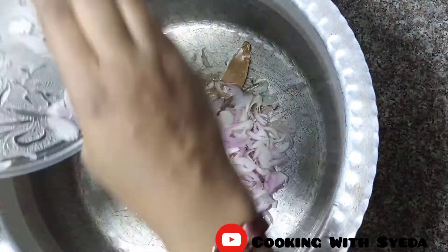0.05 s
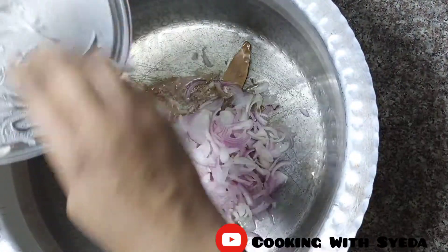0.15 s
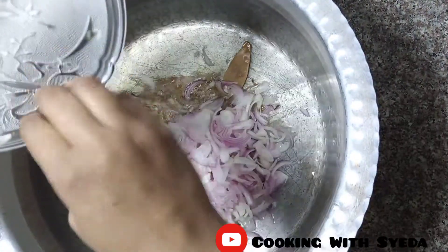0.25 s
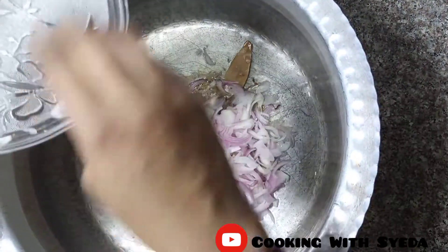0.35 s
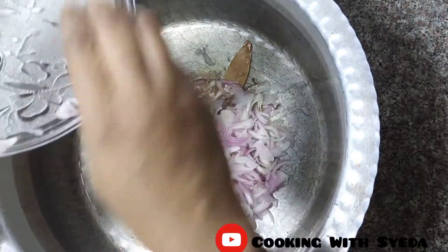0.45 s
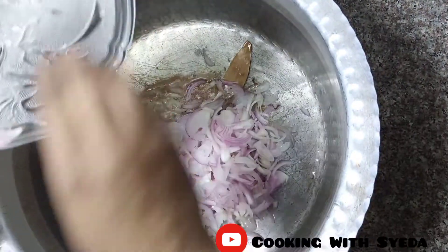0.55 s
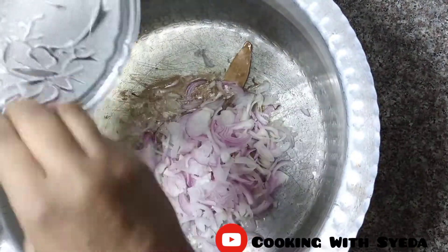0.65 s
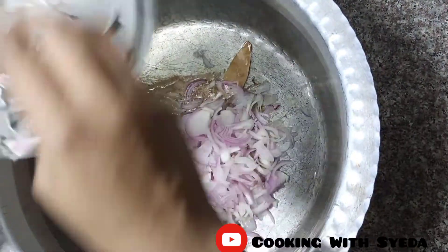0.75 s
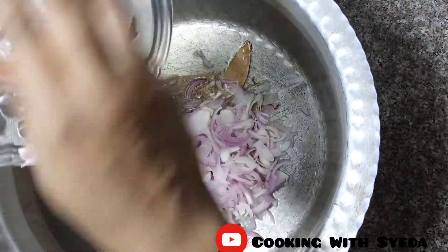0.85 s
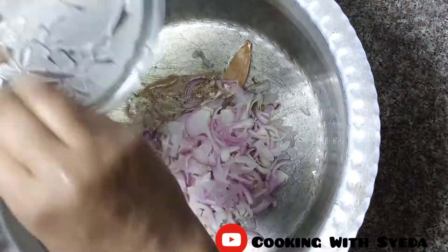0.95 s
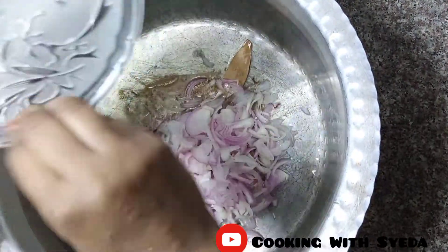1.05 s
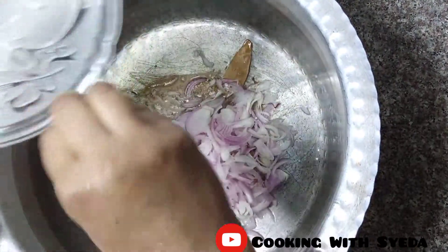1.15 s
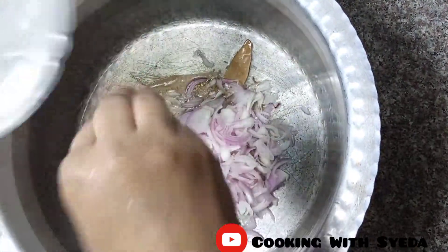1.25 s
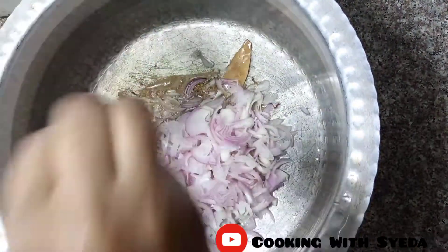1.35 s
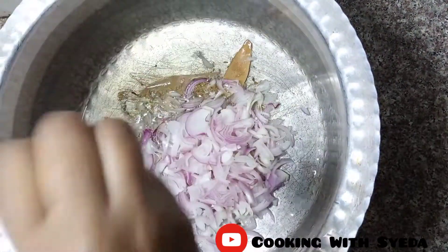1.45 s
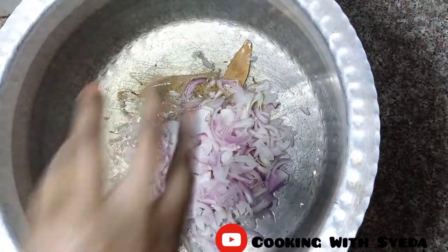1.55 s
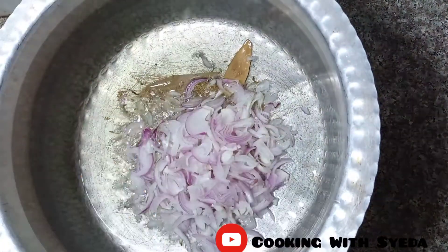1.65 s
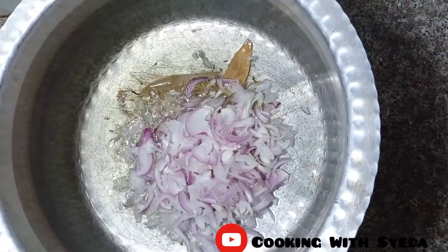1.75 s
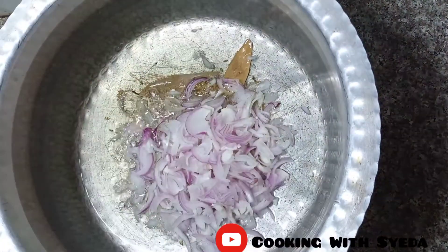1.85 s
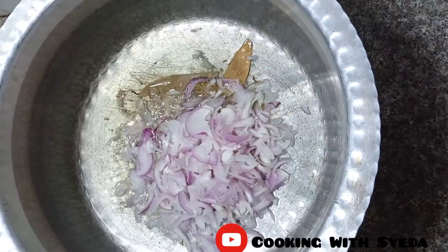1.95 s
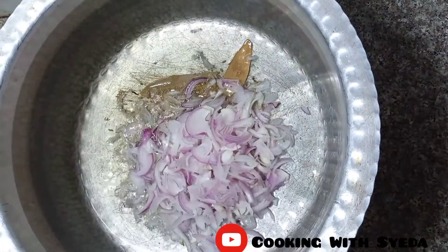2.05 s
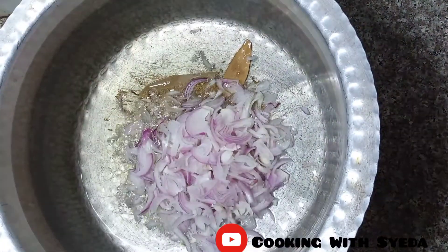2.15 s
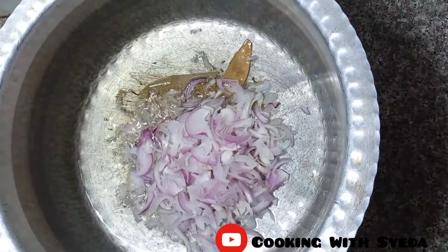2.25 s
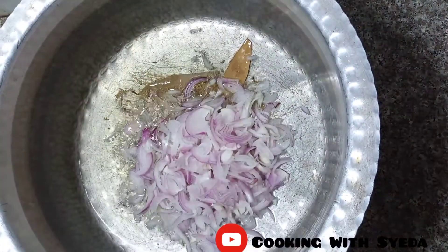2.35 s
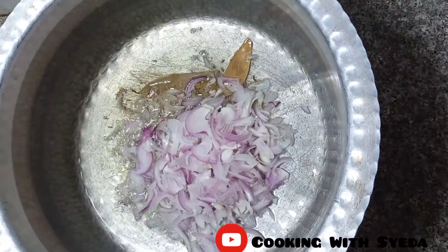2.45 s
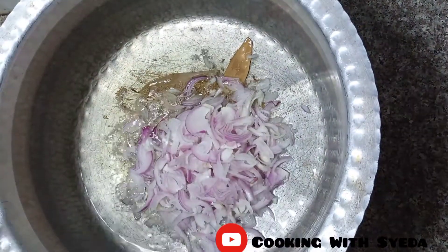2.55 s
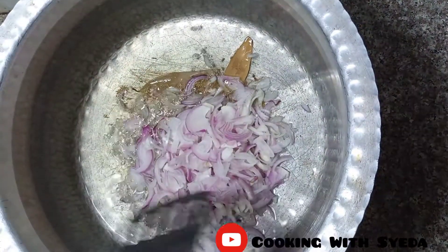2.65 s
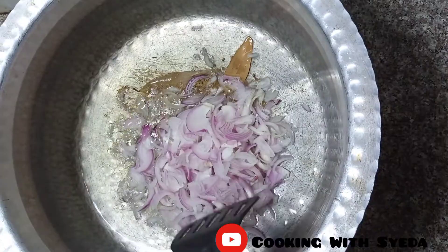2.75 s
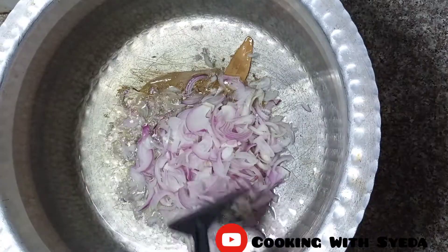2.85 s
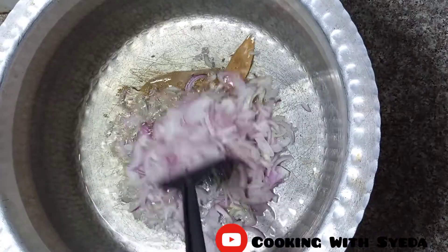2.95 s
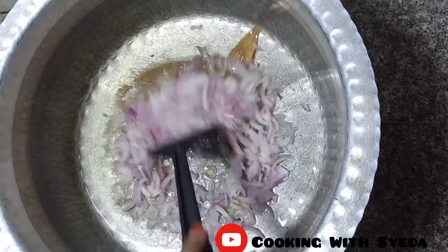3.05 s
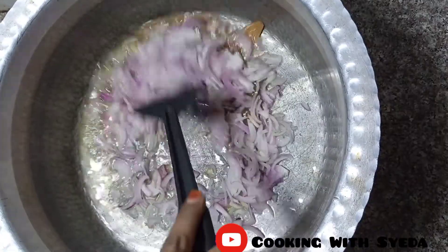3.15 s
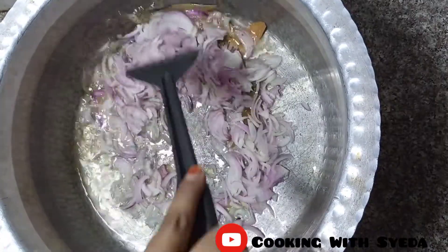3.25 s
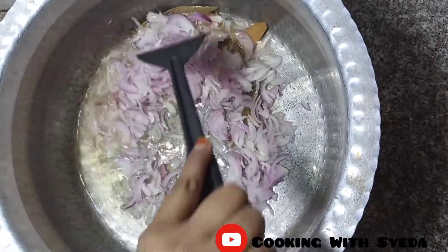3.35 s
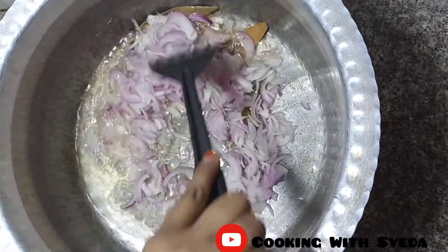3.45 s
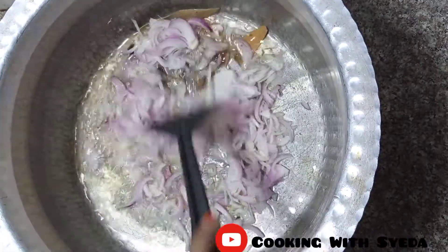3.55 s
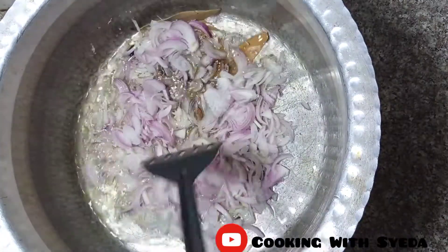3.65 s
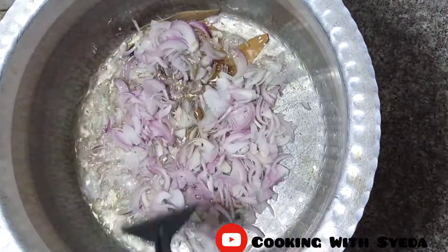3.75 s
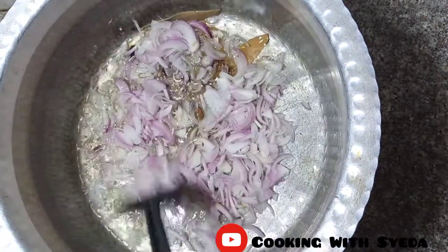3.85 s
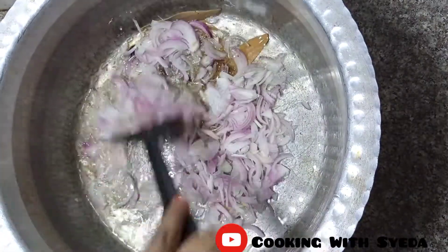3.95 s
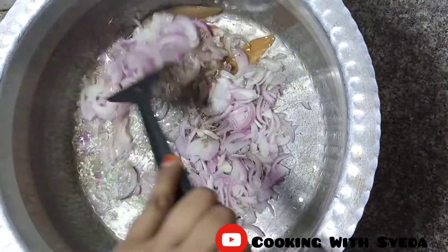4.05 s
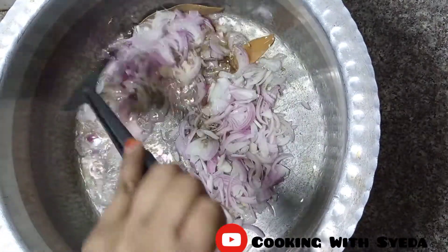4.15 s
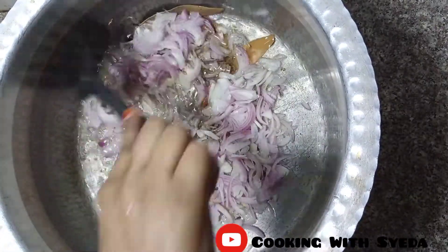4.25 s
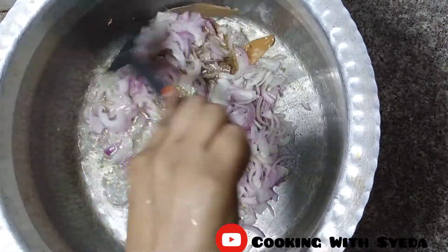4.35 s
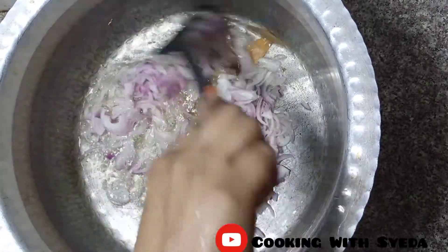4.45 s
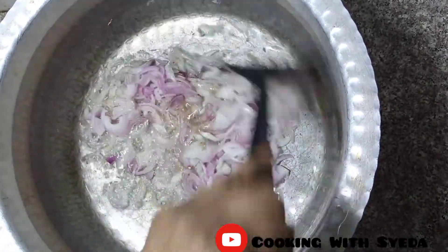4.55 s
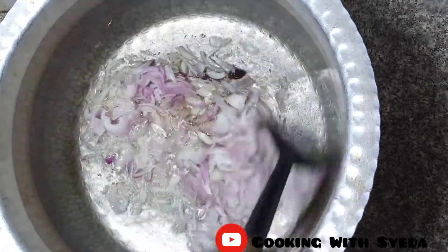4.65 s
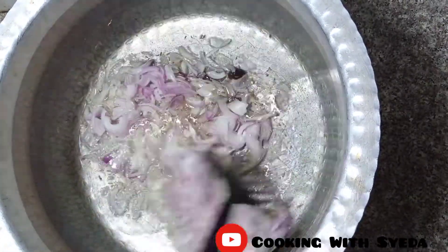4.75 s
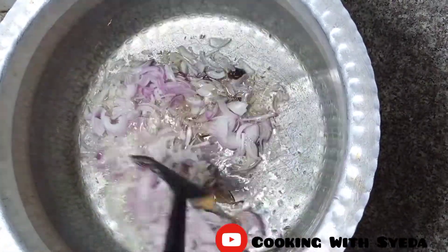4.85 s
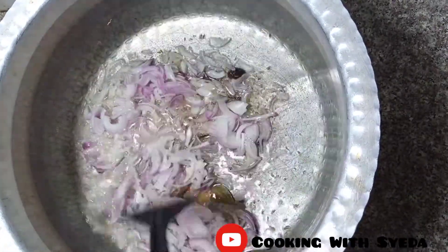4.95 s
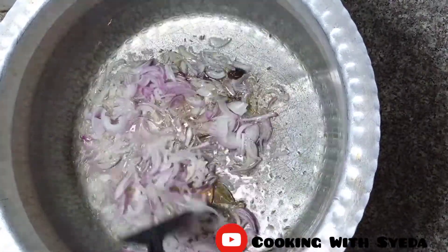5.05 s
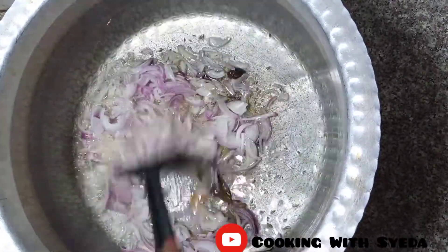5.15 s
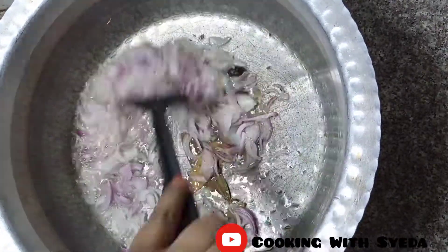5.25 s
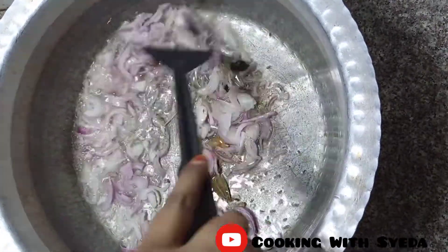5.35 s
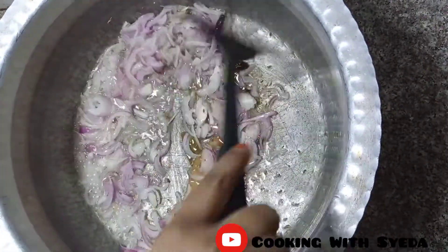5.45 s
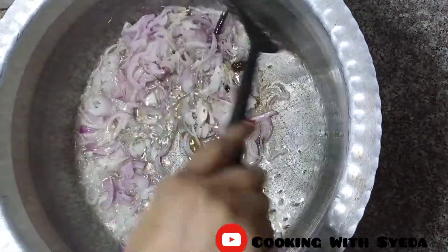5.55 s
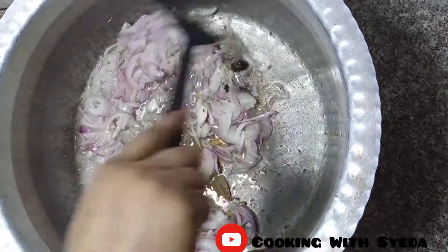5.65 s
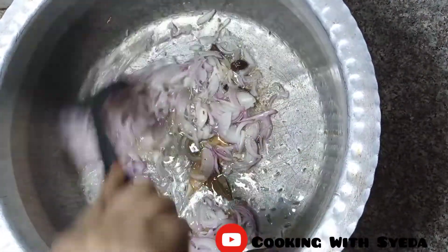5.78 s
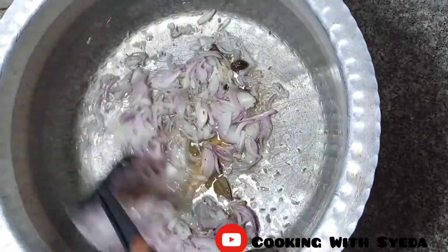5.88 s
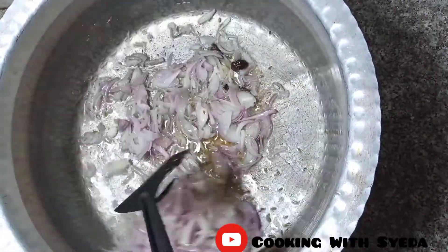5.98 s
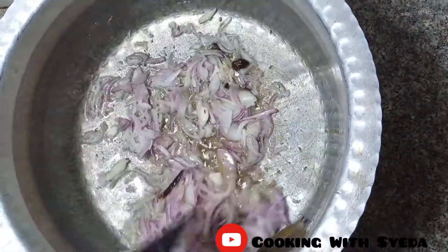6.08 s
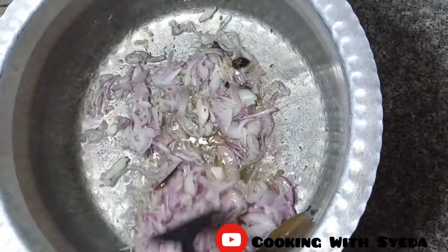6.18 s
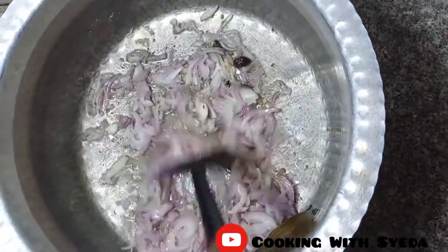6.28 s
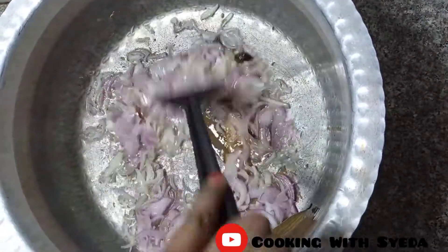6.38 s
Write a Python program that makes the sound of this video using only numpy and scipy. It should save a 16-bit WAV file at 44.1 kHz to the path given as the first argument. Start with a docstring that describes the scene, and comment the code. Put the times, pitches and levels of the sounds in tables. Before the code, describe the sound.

Sliced onions sizzle and spit in oil in a metal pot while a spatula lands, scrapes the floor and knocks the ringing wall.

```python
"""Onions frying while a spatula works the pot

Sliced onions fry in oil in a wide metal pot: bubble bursts ring over steam hiss, drops crack and puff.
A spatula lands on the damped pot floor, scrapes it with stick-slip clicks and knocks the ringing wall.
Short soft-started rings add plops and thumps; gusts of air rumble on the microphone about every 2 s.
A low drone swells once over a faint hum, and reflections carry a noise tail behind the pot."""
import sys
import numpy as np
from scipy import signal
from scipy.fft import rfft, irfft
from scipy.io import wavfile

SR = 44100
rng = np.random.default_rng(int(sys.argv[2]) if len(sys.argv) > 2 else 0)


def int16_out(signal):
    """Quantize to a 16-bit WAV file."""
    q = np.round(np.clip(np.atleast_2d(signal).T, -1, 1) * 32767)
    wavfile.write(sys.argv[1], SR, q.astype(np.int16))


N = 282945

# course of the frying: [t/s, fizz level before trim/dB, treble lift/dB]
FRYING_COURSE = [(0, -47, -16), (.4, -48.5, -0.5), (2.2, -49, -0.5), (2.9, -48.5, -2.5), (3.3, -40, -3.5),
                 (4.07, -42, -0.5), (5.45, -41.5, 0.5), (5.58, -45, 0), (5.7, -39, -2), (5.9, -41, -1),
                 (6.42, -43, 0.5)]
# spectrum that shapes the frying: [f/Hz, relative level per Hz/dB]
FIZZ_COLOUR = [(150, -39), (250, -18.5), (850, -14.5), (1050, -22.5), (1500, -15.5), (2700, -12),
               (3200, -1), (3800, 0.5), (5300, -5), (5500, -16), (7000, -25), (8100, -36), (13900, -33.5),
               (14700, -22), (15700, -3.5)]


def from_db(db):
    """Amplitude factor of a level in dB."""
    return 10 ** (np.asarray(db) / 20)


def rms_one(x):
    """Scale to an RMS of 1."""
    return x / np.sqrt(np.mean(x ** 2) + 1e-20)


def in_time(rows):
    """Turn a table of times and values into one curve per value column."""
    s, *columns = np.transpose(rows)
    return [np.interp(np.arange(N) / SR, s, column) for column in columns]


def drift(rate_hz):
    """Slow random wander with an RMS of 1: noise through a double one-pole low-pass."""
    r = np.exp(-2 * np.pi * rate_hz / SR)
    wander = signal.lfilter([1], [1, -2 * r, r * r], rng.standard_normal(N + SR))
    return rms_one(wander[SR:])  # the first second lets the filter settle


def colour(x, spectrum, size=4096):
    """Causal (minimum-phase) filter that follows a spectrum, built by folding its cepstrum."""
    hz, level_db = np.transpose(spectrum)
    bins_hz = np.maximum(np.arange(size // 2 + 1) * SR / size, 1)
    log_gain = np.interp(np.log(bins_hz), np.log(hz), level_db) * np.log(10) / 20
    cepstrum = irfft(log_gain)
    cepstrum[1:size // 2] *= 2
    cepstrum[size // 2 + 1:] = 0
    impulse_response = irfft(np.exp(rfft(cepstrum)))
    return signal.fftconvolve(x, impulse_response)[:N]


def ring(clicks, hz, t60):
    """Two-pole resonator: a unit click sets a decaying sine of about height 1 ringing."""
    r, w = from_db(-60 / (t60 * SR)), 2 * np.pi * hz / SR
    return signal.lfilter([0, np.sin(w)], [1, -2 * r * np.cos(w), r * r], clicks + 1e-18)


def resonance(x, hz, width_hz):
    """Band-pass with a gain of about 1 at its peak."""
    r = np.exp(-np.pi * width_hz / SR)
    feedback = [1, -2 * r * np.cos(2 * np.pi * hz / SR), r * r]
    return signal.lfilter(np.array([1, 0, -1]) * (1 - r * r) / 2, feedback, x)


def moving_resonance(x, hz, width_hz):
    """Band-pass that follows a pitch curve: shift down to zero, low-pass, shift back up."""
    turn = np.exp(2j * np.pi * np.cumsum(hz) / SR)
    r = np.exp(-np.pi * width_hz / SR)
    return 2 * (signal.lfilter([1 - r], [1, -r], x / turn) * turn).real


def grains(per_s, spread_db, top=5):
    """Random clicks of either sign and uneven size."""
    sizes = from_db(spread_db * np.minimum(rng.exponential(1, N), top)) * rng.choice([-1, 1], N)
    return sizes * (rng.random(N) < per_s / SR)


def click(s, level_db):
    """A single click in silence."""
    out = np.zeros(N)
    out[round(s * SR)] = from_db(level_db)
    return out


def swell(start_s, end_s, level_db, rise_db_per_s, fade_db_per_s):
    """Gain that builds up to a level, holds it and fades."""
    t = np.arange(N) / SR
    build_up = rise_db_per_s * np.maximum(start_s - t, 0)
    fade = fade_db_per_s * np.maximum(t - end_s, 0)
    return from_db(level_db - build_up - fade)


def lifted(x, lift_db):
    """The treble above about 7.8 kHz rises and falls on its own."""
    treble = signal.sosfilt(signal.butter(6, 7800, "high", fs=SR, output="sos"), x)
    return x + (from_db(lift_db) - 1) * treble


def kitchen(x):
    """Dense reflections inside the pot and off hard walls: a dying noise tail."""
    t = np.arange(SR // 2) / SR
    tail = rng.standard_normal(len(t)) * from_db(-60 * t / 0.25) * (t > .003)
    return signal.fftconvolve(x, tail / np.linalg.norm(tail))[:N]


def drone_and_hum():
    """A wavering sine with narrow noise around it swells once; narrow noise hums steadily below."""
    drone_hz, hum_hz, hum_width_hz, hum_db = 341, 151, 16, -73.5
    t, noise = np.arange(N) / SR, rng.standard_normal(N)
    tone = np.sin(2 * np.pi * drone_hz * t) * from_db(2.0 * drift(14.0))
    roughness = 0.48 * rms_one(resonance(noise, drone_hz, 36.0))
    envelope = swell(1.381, 1.532, -52.5, rise_db_per_s=211, fade_db_per_s=93)
    hum = from_db(hum_db) * rms_one(resonance(noise, hum_hz, hum_width_hz))
    return envelope * (tone + roughness) + hum


def gusts():
    """Air turbulence on the microphone: lumpy low noise that swells with each gust."""
    # gusts of air: [start/s, end/s, level before lumps/dB, build-up/dB per s, fade/dB per s]
    gust_swells = [(0, 0.356, -46, 300, 120), (2.166, 2.36, -46.5, 93, 68), (4.09, 4.742, -45.5, 344, 187),
                   (6.25, 6.42, -56, 400, 100)]
    # spectrum of the rumble: [f/Hz, relative level per Hz/dB]
    rumble_colour = [(12, -52), (20, -46.5), (60, -2), (119, -1.5), (144, -10), (216, -21.5), (251, -34.5),
                     (320, -45.5), (420, -47), (700, -120)]
    still_air_db = -81.5  # faint rumble between the gusts
    lumps = from_db(3.14 * drift(36.0))
    strength = from_db(still_air_db) + sum(swell(*gust) for gust in gust_swells)
    rumble = rms_one(colour(rng.standard_normal(N), rumble_colour, size=16384))
    return strength * lumps * rumble


def low_rings():
    """Short soft-started rings: hollow plops, low thumps, a wall ring, a low note as the drone begins."""
    # rings: [t/s, drive/dB, pitch f/Hz, t60/s]
    soft_rings = [(.855, -59.5, 2050, 0.3), (0.857, -62, 2430, 0.075), (.917, -51.5, 818, 0.059),
                  (.945, -49.5, 798, 0.04), (1.362, -46, 224, 0.95), (3.031, -44, 546, 0.14),
                  (3.08, -35, 510, 0.079), (3.215, -8.5, 770, 0.022), (3.298, -24, 165, .08),
                  (3.722, -28, 190, .06), (4.33, -40, 653, 0.28), (5.646, -20, 599, 0.033),
                  (5.651, -11.5, 389, 0.067), (5.658, -26, 159.8, 0.32)]
    out = np.zeros(N)
    for s, drive_db, hz, t60 in soft_rings:
        # a first short resonator softens the start
        soft_start = ring(click(s, drive_db), hz, 0.01) * hz / 2440.0
        out += 0.13 * ring(soft_start, hz, t60)
    return out


def pot_wall():
    """Each contact is a short rattle that drives most the wall modes near its own pitch."""
    # ringing modes of the wall: [f/Hz, relative level/dB, t60/s]
    wall_modes = [(249.6, 9, 0.075), (293, 1.5, 0.057), (395.5, 2, 0.054), (648, -0.5, 0.71),
                  (981, -8.5, 2.2), (1895, -6.5, 0.12), (2044, 0.5, 0.42), (2060, 9, 0.13),
                  (2190, -14.5, 0.62), (2800, -8, 0.21), (3130, 8, 0.062), (3112, 4.5, 0.13),
                  (3290, 4.5, 0.062), (4225, 5, 0.057), (5270, 14.5, 0.012)]
    # knocks and rubs: [t/s, relative level/dB, best-driven f/Hz, reach/octaves, contact/s]
    knocks = [(3.58, -37, 389, 0.17, 0.24), (4.305, -32.5, 2700, 0.98, 0.031),
               (4.618, -46, 237, 0.46, 0.3), (4.655, -32.5, 348, 0.33, 0.091),
              (5.646, -37.5, 623, 0.47, 0.012), (5.675, -43, 293, 1.7, 0.047),
              (5.665, -51.5, 2080, 0.35, 0.029), (5.794, -43, 2080, 0.22, 0.05),
              (5.841, -51, 259, 0.13, 0.1)]
    # moments when the blade leans on the wall and stills its long ring: [t/s]
    rests_s = [4.65, 5.97]
    stilled_t60_s = .12
    t, out = np.arange(SR) / SR, np.zeros(N + SR)
    rattles = rng.standard_normal((len(knocks), SR))
    # the higher rings waver at random
    wavers = [from_db(4.5 * min(hz / 2000, 1) * drift(22.0))[:SR] for hz, _, _ in wall_modes]
    for (s, level_db, centre_hz, reach, lasts), rattle in zip(knocks, rattles):
        touch = rattle * np.sin(np.pi * np.minimum(t / lasts, 1) ** 0.23)
        free_s = min(rest - s for rest in rests_s if rest > s)
        damping = from_db(-60 * np.maximum(t - free_s, 0) / stilled_t60_s)
        at = slice(round(s * SR), round(s * SR) + SR)
        for (hz, mode_db, t60), waver in zip(wall_modes, wavers):
            drive = resonance(resonance(touch, hz, 0.39 * hz), hz, 0.39 * hz)
            # part of the rattle falls in step with the ring
            in_step = 0.104 * np.abs(touch) * np.sin(2 * np.pi * hz * t)
            tone = ring(drive + in_step, hz, t60)
            off_pitch_db = 4.43 * (np.log2(hz / centre_hz) / reach) ** 2
            gain = from_db(level_db + mode_db - off_pitch_db) / np.abs(tone).max()
            out[at] += gain * tone * damping * waver
    return out[:N]


def strokes():
    """Pressure of the spatula edge on the floor, and how much bass it brings out."""
    # the edge digs in: [peak t/s, held/s, peak pressure/dB, build-up/dB per s, bass lift/dB]
    digs = [(2.626, 0.0034, -19, 4999, 3.5), (3.029, 0.014, -49, 699, 9.5), (3.083, 0.014, -42, 1506, 3),
            (3.273, 0.015, -28.5, 1500, -2), (3.3, 0.0029, -21.5, 904, 1.5), (3.46, 0.037, -29, 1209, -1.5),
            (3.686, 0.032, -35, 304, 0), (3.725, 0.0043, -21, 911, 4)]
    dig_fade_db_per_s, trail_db, trail_fade_db_per_s = 399, -7, 153.5  # a fast drop, then a trail
    drag_start_s, drag_end_s, drag_db, drag_bass_db = 3.2, 3.73, -36, -2
    bass_fade_db_per_s = 45  # once the edge lets go the bass dies first
    t = np.arange(N) / SR
    # one long steady drag lies under the digs
    long_drag = swell(drag_start_s, drag_end_s, drag_db, rise_db_per_s=2005, fade_db_per_s=135)
    parts = [(long_drag, drag_end_s, drag_bass_db)]
    for s, held, peak_db, rise, bass_db in digs:
        bite = swell(s, s + held, peak_db, rise, dig_fade_db_per_s)
        trail = swell(s, s + held, peak_db + trail_db, rise, trail_fade_db_per_s)
        parts.append((np.maximum(bite, trail), s + held, bass_db))
    pressure = sum(gain for gain, _, _ in parts) + 1e-9
    weighted_lift = sum(gain * (bass_db - bass_fade_db_per_s * np.maximum(t - end, 0))
                        for gain, end, bass_db in parts)
    return pressure, from_db(weighted_lift / pressure)


def pot_floor():
    """Stick-slip clicks drive the damped floor; each mode comes and goes as the edge moves on."""
    # modes of the oil-damped floor: [f/Hz, width/Hz, relative level/dB]
    floor_modes = [(375, 28, -4), (709, 66, -7.5), (1156, 35, -8), (1334, 27, -4.5), (1744, 22, -6),
                   (2436, 54, -4), (3130, 66, -10), (3760, 24, -19), (4530, 25, -5), (6000, 50, -12),
                   (6240, 29, -17), (6770, 66, -14.5)]
    # three modes shift as the blade presses on other spots: [t/s, low f/Hz, middle f/Hz, high f/Hz]
    pressed_hz = [(2.8, 1520, 2600, 4190), (3.08, 1440, 2644, 4260), (3.3, 1520, 2620, 4156),
                  (3.48, 1410, 2730, 4130), (3.68, 1450, 2680, 4133), (3.75, 1545, 2563, 4105)]
    # the same three modes: [width/Hz, relative level/dB]
    pressed_modes = [(39.5, -8.5), (25, 3.5), (40.4, 4)]
    # spectrum of the scrape between the modes: [f/Hz, relative level per Hz/dB]
    scrape_colour = [(120, -15.5), (300, -16), (900, -11), (1500, 1.5), (2050, -17), (2600, -5.5),
                     (4300, -2.5), (5400, -35.5), (7000, -23.5), (8200, -36.5), (16000, -53.5)]
    pressure, bass_gain = strokes()
    slips = rms_one(grains(3500.0 * from_db(1.8 * drift(60.0)), spread_db=3.0))
    driven = pressure * slips
    landing = click(2.6268, 5.5)  # the blade's first blow on the floor
    modes = np.zeros(N)
    for k, (hz, width, level_db) in enumerate(floor_modes):
        push = driven * from_db(3.9 * drift(11.0)) + landing
        modes += (-1) ** k * from_db(level_db) * resonance(push, hz, width)
    for hz, (width, level_db) in zip(in_time(pressed_hz), pressed_modes):
        push = driven * from_db(1.3 * drift(15.0)) + landing
        modes += from_db(level_db) * moving_resonance(push, hz, width)
    body = from_db(15.0) * modes + from_db(9.5) * colour(driven, scrape_colour)
    body = colour(body, [(4600, 0), (5600, -12.0)])  # the scrape is duller above about 5 kHz
    # keep the low skirts of the modes out of the scrape
    body = signal.sosfilt(signal.butter(4, 240, "high", fs=SR, output="sos"), body)
    bass = signal.sosfilt(signal.butter(4, 900, fs=SR, output="sos"), body)
    return body + (bass_gain - 1) * bass


def spits():
    """The loudest drops: a crack, and a puff of steam that dies away around the drop's pitch."""
    # spitting drops: [t/s, puff level/dB, pitch f/Hz, crack drive/dB]
    drops = [(0.0288, -28, 4450, -24.5), (0.178, -23.5, 4600, -37), (0.854, -35, 4280, -30.5),
             (1.113, -38.5, 6400, -35), (1.2926, -29.5, 4710, -32), (1.33, -36, 4400, -40),
             (1.349, -23, 3950, -54), (1.6366, -39, 4300, -32), (1.728, -38.5, 4800, -33),
             (1.806, -28, 5310, -33.5), (2.0475, -45, 1510, -48), (2.362, -32.5, 6400, -32),
             (2.4216, -33, 5100, -34.5), (2.555, -33, 3960, -28), (2.713, -39, 6570, -30),
             (2.875, -38.5, 4880, -60), (3.1084, -28.5, 4970, -38), (3.419, -36.5, 6320, -44),
             (3.59, -34, 2670, -47), (3.608, -32, 3630, -36), (3.641, -40, 6370, -33),
             (4.67, -21, 4010, -30), (5.225, -28, 3800, -32), (5.472, -24, 4330, -62),
             (5.8951, -30.5, 3800, -20.5), (6.1075, -30, 4500, -54)]
    puffs, cracks = np.zeros(N + SR), np.zeros(N + SR)
    t = np.arange(SR // 4) / SR
    noises = rng.standard_normal((len(drops), len(t)))
    for (s, puff_db, hz, crack_db), noise in zip(drops, noises):
        at = slice(round(s * SR), round(s * SR) + len(t))
        steam = noise * from_db(-60 * t / 0.059)
        puff = resonance(resonance(steam, hz, 590.0), hz, 590.0)
        puffs[at] += from_db(puff_db) * puff / np.abs(puff).max()
        cracks[at] += from_db(crack_db) * noise * from_db(-60 * t / .03)
    # cracks are flatter and brighter than the fizz
    crack_colour = [(hz, 0.85 * level_db) for hz, level_db in FIZZ_COLOUR]
    return puffs[:N], lifted(colour(cracks[:N], crack_colour), 5.0)


def crackle():
    """Small random spits: a tick with a short tail, dealt to narrow bands, louder as the fizz rises."""
    level_db, lift_db = in_time(FRYING_COURSE)
    ticks = np.abs(grains(140.0, spread_db=4.5, top=2.87))
    dealt = rng.integers(0, 16, N)
    noise, out = rng.standard_normal(N), np.zeros(N)
    decay = from_db(-60 / (0.056 * SR))
    for k, hz in enumerate(np.geomspace(1500, 15000, 16)):
        tails = signal.lfilter([1], [1, -decay], ticks * (dealt == k) + 1e-18)
        band = resonance(resonance(tails * noise, hz, 0.25 * hz), hz, 0.25 * hz)
        out += (hz / 4000) ** 0.12 * band
    return from_db(level_db + 7.5) * lifted(colour(out, FIZZ_COLOUR), lift_db)


def fizz():
    """Bubbles of every size burst and ring a few cycles, each size in patches, over steam hiss."""
    # the pot sings along with the fizz: [f/Hz, width/Hz, relative level/dB]
    cavity_modes = [(389, 6.8, -2.5), (1640, 16, 7.5), (2037, 45, 5.5), (5285, 38, 2), (6460, 130, 5)]
    level_db, lift_db = in_time(FRYING_COURSE)
    bursts = grains(7000.0 * from_db(2.7 * drift(9.0)), spread_db=-2.0)
    pitches_hz = np.geomspace(300, 15500, 24)
    dealt = rng.integers(0, 24, N)  # the bubble size of each burst
    out = 2.86 * rng.standard_normal(N)  # steam hiss
    for k, hz in enumerate(pitches_hz):
        patch = from_db(5.2 * drift(10.6))
        bubbles = rms_one(ring(bursts * (dealt == k), hz, 4.9 / hz))
        out += patch * np.sqrt(hz / SR) * bubbles
    singing = sum(from_db(gain_db) * resonance(out, hz, width) for hz, width, gain_db in cavity_modes)
    out = colour(out + singing, FIZZ_COLOUR)
    return from_db(level_db - 0.5) * lifted(rms_one(out), lift_db)


def scene():
    """Sum the frying, the pot with its reflections, the gusts and the drone."""
    puffs, cracks = spits()
    pot = puffs + pot_wall() + low_rings() + pot_floor()
    # the pot is too small to radiate deep bass
    pot = signal.sosfilt(signal.butter(4, 130, "high", fs=SR, output="sos"), pot)
    # little of the pot is heard above about 7 kHz
    pot = signal.sosfilt(signal.butter(8, 7300, fs=SR, output="sos"), pot)
    pot = pot + cracks + crackle()
    reflections = from_db(-7.0) * kitchen(pot)
    return (fizz() + pot + reflections + gusts() + drone_and_hum())[None]


def record(dry):
    """The top is cut steeply."""
    cutoff_hz = 15900  # edge of the stop band, 50 dB down
    return signal.sosfilt(signal.cheby2(30, 50, cutoff_hz, fs=SR, output="sos"), dry)


dry = scene()
out = record(dry)
int16_out(out)
```